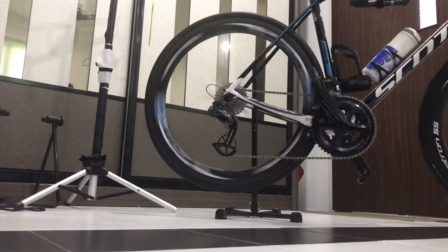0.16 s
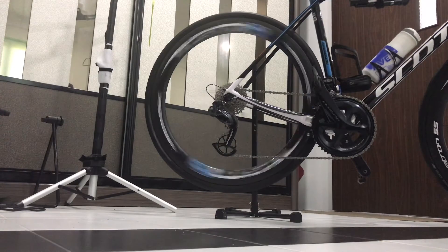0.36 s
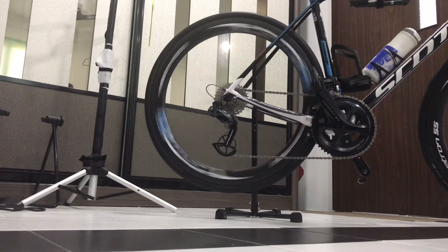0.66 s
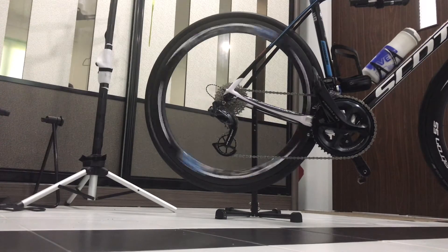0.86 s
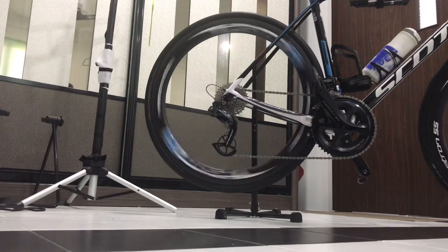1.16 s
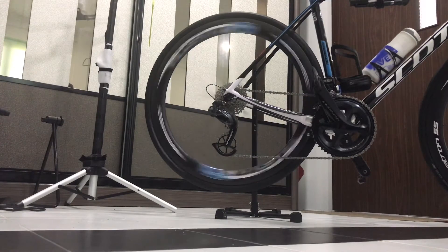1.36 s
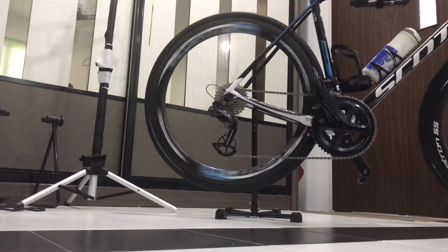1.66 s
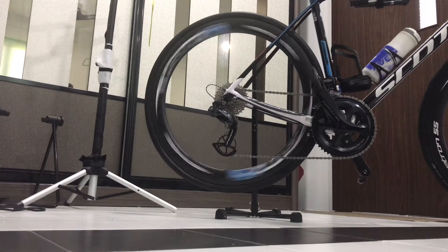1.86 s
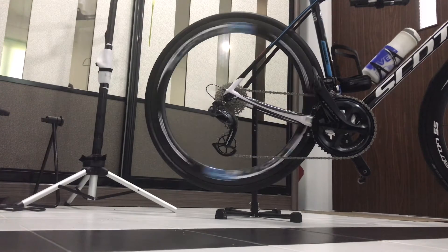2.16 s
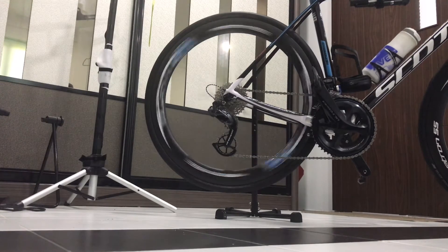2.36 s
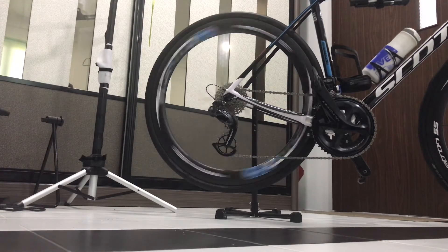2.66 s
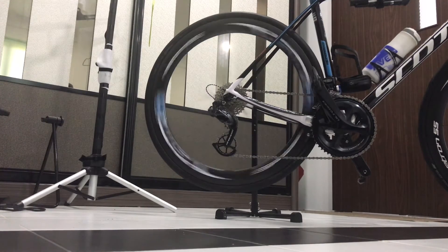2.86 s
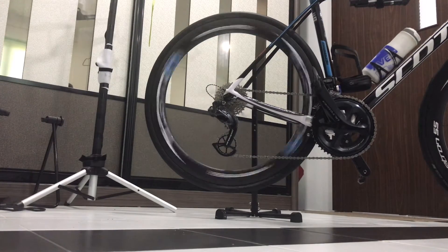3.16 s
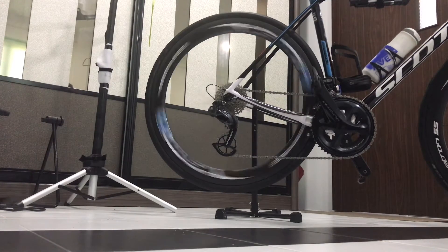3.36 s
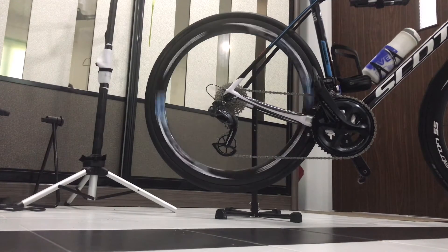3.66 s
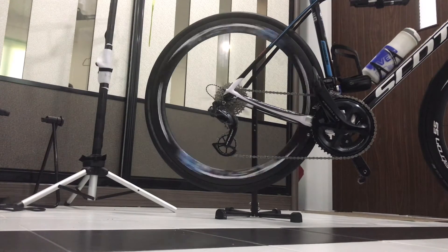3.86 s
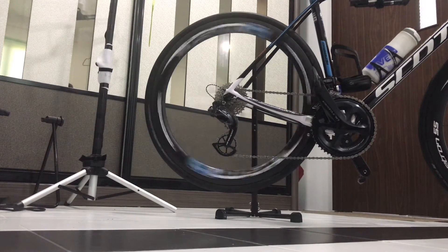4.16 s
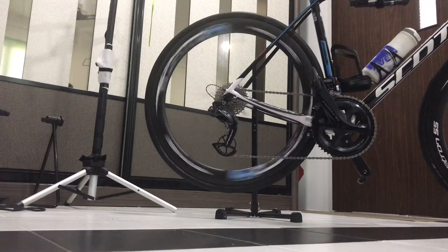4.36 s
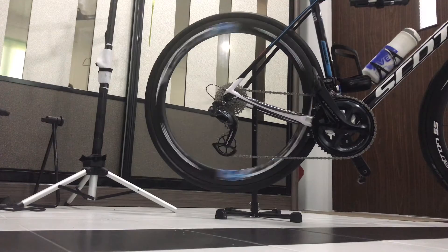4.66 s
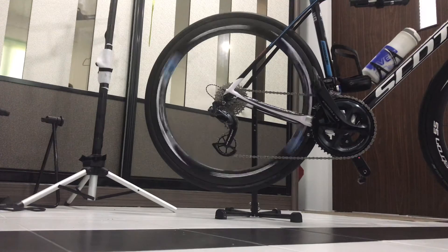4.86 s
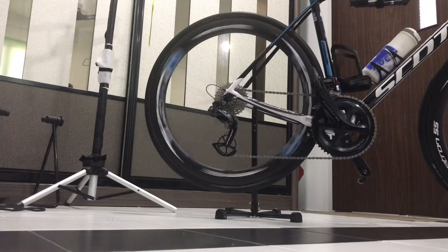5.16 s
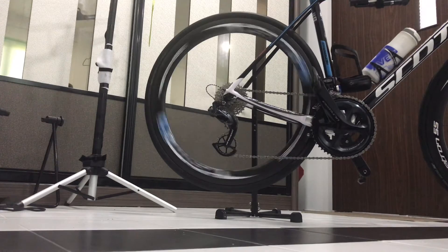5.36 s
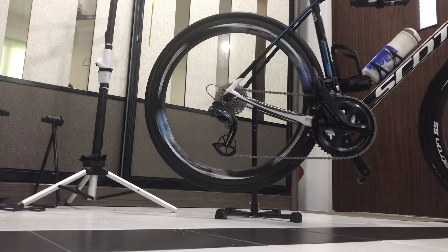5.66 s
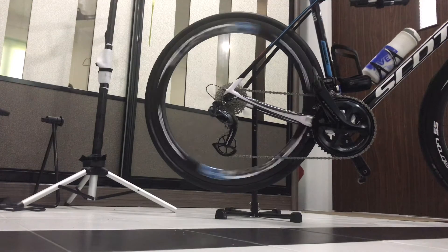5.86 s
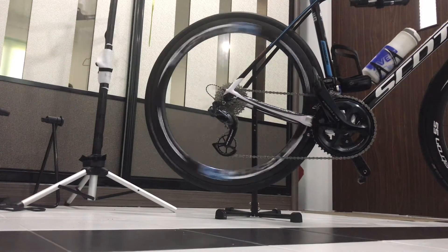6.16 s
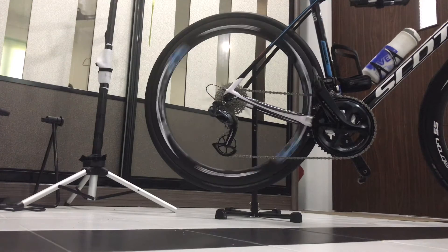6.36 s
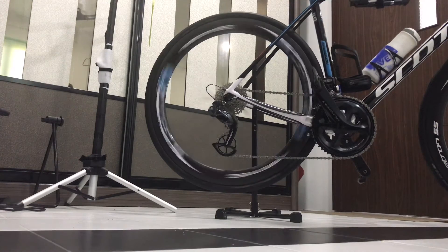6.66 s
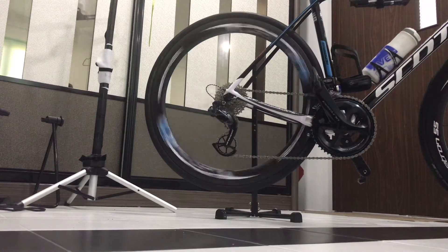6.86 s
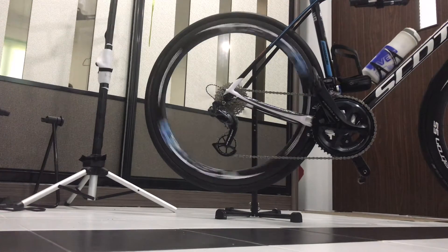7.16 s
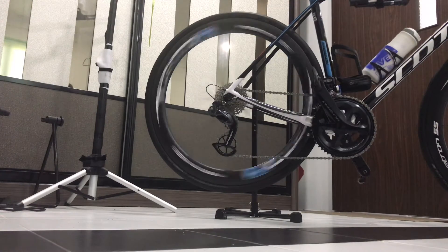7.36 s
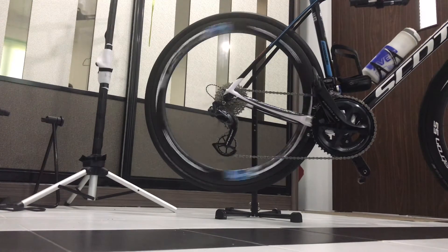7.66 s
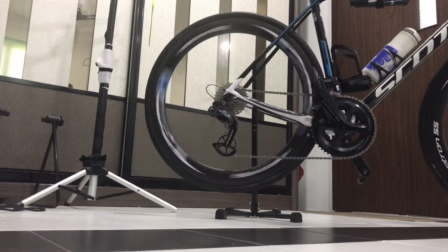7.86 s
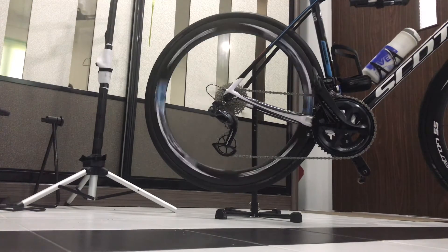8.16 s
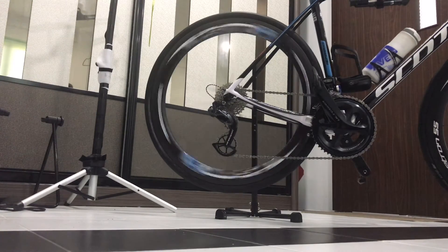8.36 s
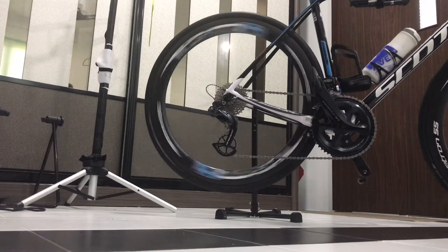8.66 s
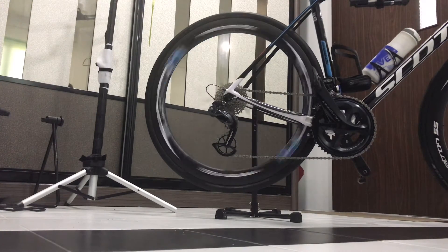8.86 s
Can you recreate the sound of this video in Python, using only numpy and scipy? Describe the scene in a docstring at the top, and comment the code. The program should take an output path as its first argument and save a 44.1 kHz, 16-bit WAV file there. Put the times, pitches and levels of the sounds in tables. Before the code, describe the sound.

Rapid ratchet ticks from a freely spinning bicycle wheel merge into a high, churning buzz that slows slightly in a small room.

```python
"""A coasting bicycle wheel

A rear wheel spins on a stand in a small tiled room, slowly losing speed. In its hub, small catches
(pawls) snap over a 24-tooth ratchet some 40 times a second. Each click is a steel tick, a knock and
a ring of rim, spokes, hub and frame. The rim's note slides down twice a turn and most parts swell with
the wheel's angle, so the buzz churns. The room echoes over a faint ventilation hum."""
import sys
import numpy as np
from scipy import signal
from scipy.fft import rfft, irfft, next_fast_len
from scipy.io import wavfile
from scipy.ndimage import map_coordinates

SR = 44100
rng = np.random.default_rng(int(sys.argv[2]) if len(sys.argv) > 2 else 0)


def transcribe(u):
    """Save the signal u as a 16-bit wav file named by the first command-line argument.

    u: samples, shape (n,) or (channels, n), limited to [-1, 1]; the rate is SR.
    q: integer samples, one column per channel.
    """
    v = np.clip(np.atleast_2d(u).T, -1, 1)
    q = np.round(v * 32767).astype(np.int16)
    wavfile.write(sys.argv[1], SR, q)


N = 397782

TEETH = 24
AGE = np.arange(4096) / SR  # seconds since a click began


def freehub():
    """Pawls snap over teeth and shake the wheel: each click's start time, tooth and sound (one a row)."""
    times, tooth, speed = ratchet(jitter_s=0.0001)
    impact = pawl_tick(tooth) + wheel_knock(tooth)
    ringing = rim_ring(tooth) + spoke_ring(tooth) + hub_ring(tooth) + frame_ring()
    hard_db = 1.3 * bell(tooth[:, None], centre=22.6, width=0.7)  # a few teeth snap harder
    force = amp(hard_db + 0.21 * rng.standard_normal((len(times), 1)))
    force *= speed[:, None] ** 0.084  # a slower wheel drops its pawls more gently
    return times, tooth, force * (treble_dip(impact, tooth) + ringing)


def ratchet(jitter_s):
    """The wheel slows: when each pawl drops, on which tooth, and the speed as a share of the first."""
    t = np.arange(-SR // 4, N) / SR  # the wheel is already spinning
    rate, slowing, easing = 46.829, 1.161, 0.01462  # teeth per s, s^2, s^3; air drag eases as it slows
    teeth_passed = rate * t - slowing * t ** 2 / 2 + easing * t ** 3 / 6
    count = np.arange(int(teeth_passed[0]), int(teeth_passed[-1]) + 1)
    times = 0.0185 + np.interp(count, teeth_passed, t)
    gaps = np.gradient(times)
    late_s = 0.00035 * np.cos(wheel_angle(count, 8.7))  # the ratchet sits off centre
    late_s += jitter_s * rng.standard_normal(len(times))
    return times + late_s, count % TEETH, gaps[0] / gaps


def pawl_tick(tooth):
    """A steel pawl hits a steel tooth with a short, bright tick."""
    # tone colour of steel on steel: f/Hz, level/dB
    spectrum = [(3500, -55), (5200, -18.5), (6000, -8.5), (7000, -12.5), (7900, -6.5), (8350, -10.5),
                (8850, -2.5), (9350, -1.5), (9850, -0.5), (10500, -6), (11000, 0.5), (11900, -2),
                (13500, -2), (15800, -3.5)]
    gain = amp(swing(tooth, once=(0.3, 17), twice=(0.1, 12.7), wear_db=0.3) - 3.0)
    return gain * struck(crowded_notes(tooth, spectrum, fresh=0.69), attack_s=0.00037, fade_s=0.026)


def wheel_knock(tooth):
    """The blow runs through the spokes and hollow rim, stirring many notes at once."""
    # tone colour of spokes and rim together: f/Hz, level/dB
    spectrum = [(400, -36), (800, -25), (1300, -17.5), (1680, -2), (2050, -3.5), (2550, -2), (2800, -1),
                (3270, -6.5), (3480, -7), (3720, -10.5), (3980, -7), (4550, -14.5), (4850, -18.5),
                (7000, -64)]
    gain = amp(swing(tooth, once=(0.3, 18), twice=(0.4, 9), wear_db=0.5) - 10.5)
    return gain * struck(crowded_notes(tooth, spectrum, fresh=0.79), attack_s=0.0005, fade_s=0.057)


def treble_dip(clicks, tooth):
    """The lower treble of the clicks dips and returns once a turn."""
    n = 2 * len(AGE)
    band = bell(np.fft.rfftfreq(n, 1 / SR), centre=5200, width=960)
    change_db = swing(tooth, once=(1.5, 15.5), twice=(0.5, 10.5), wear_db=0.3)
    return irfft(rfft(clicks, n) * amp(change_db * band))[:, :len(AGE)]


def rim_ring(tooth):
    """The rim's note slides down twice a turn as the wheel shows another side."""
    # slides of the rim's note: first tooth, last tooth, start f/Hz, end f/Hz
    slides = [(8, 20, 2190, 1780), (21, 31, 2190, 1550)]
    hz = np.zeros((TEETH, 1))
    for first, last, start_hz, end_hz in slides:
        teeth = np.arange(first, last + 1) % TEETH
        hz[teeth, 0] = np.linspace(start_hz, end_hz, len(teeth))
    swell_db = 8.5 * bell(hz[tooth], centre=1890, width=75)  # the pitch where the rim rings best
    return amp(swell_db - 19.6) * note(tooth, hz[tooth], fade_s=0.027, scatter=0.24)


def spoke_ring(tooth, spread_hz=58):
    """The spokes ring with two notes whose pitch differs a little from tooth to tooth."""
    low_db = swing(tooth, once=(2.2, 19.4), twice=(1.64, 10.4), wear_db=1.2)
    low_hz = 2804 - 15 * low_db + spread_hz * quirk(tooth)  # lowest where it is loudest
    low = amp(low_db - 22.0) * note(tooth, low_hz, fade_s=0.033, scatter=0.27)
    high_hz = 3514 + spread_hz * quirk(tooth)
    high_db = swing(tooth, once=(3, 12.5), twice=(4.2, 3.8), wear_db=4.6)
    high = amp(high_db - 26.5) * note(tooth, high_hz, fade_s=0.038, scatter=0.3)
    return low + high


def hub_ring(tooth):
    """The hub and its gears give a brief, high ring."""
    # notes of hub and gears: f/Hz, level/dB, time to fade by 60 dB/s
    notes = [(6320, 0, 0.03), (6417, -3, 0.04), (9880, 4.5, 0.0059), (10990, 1, 0.011)]
    gain = amp(swing(tooth, once=(0.73, 19), twice=(0.27, 9.5), wear_db=1.2) - 22)
    return gain * sum(amp(db) * note(tooth, hz, fade_s, scatter=0.83) for hz, db, fade_s in notes)


def frame_ring():
    """The frame answers every tooth alike, giving the buzz faint overtones of the click rate."""
    # notes of frame and stand: f/Hz, level/dB, time to fade by 60 dB/s
    notes = [(593, -10, 0.053), (943, -7, 0.063), (1023, -5.5, 0.12), (1198, -3, 0.047), (1553, 2.5, 0.12)]
    rings = [amp(db) * struck(np.sin(2 * np.pi * hz * AGE), 0.00038, fade_s) for hz, db, fade_s in notes]
    return amp(-33.5) * sum(rings)


def room(clicks, tooth, first_wall_s, steady):
    """Floor and walls echo each click along paths that change with the wheel's angle."""
    # how long the tiled room rings: f/Hz, time to fade by 60 dB/s
    fade_times = [(300, 0.34), (2000, 0.28), (7000, 0.44), (12000, 0.17), (15800, 0.28)]
    noise = rng.standard_normal((TEETH, 2 * len(AGE)))
    noise += steady * rng.standard_normal(2 * len(AGE))  # paths shared by all angles
    hz, t, bands = signal.stft(noise, SR, nperseg=256)
    fade = amp(-60 * t / value_at(fade_times, hz)[:, None])
    tails = signal.istft(bands * fade, SR, nperseg=256)[1]
    delay = np.arange(tails.shape[1]) / SR
    tails *= 1 - np.exp(-(delay / first_wall_s) ** 2)  # echoes take a moment to build
    tails /= np.linalg.norm(tails, axis=1, keepdims=True)
    return signal.fftconvolve(clicks, tails[tooth], axes=1)


def ventilation(rush_db, waver):
    """Air rushes softly over a few low, slightly unsteady hum tones."""
    # tone colour of the moving air: f/Hz, level/dB
    spectrum = [(20, -40), (33, -22), (42, 0.5), (70, -3.5), (100, 0.5), (160, 0.5), (240, -3.5), (300, -2),
                (450, -8), (600, -7), (800, -14), (1500, -11), (6000, -21)]
    # tones of the hum: f/Hz, level/dB
    tones = [(49.5, -69), (99, -64), (142, -71.5), (161.5, -65)]
    t = np.arange(N) / SR
    rush = coloured(rng.standard_normal(next_fast_len(N)), spectrum)[:N]
    hum = np.zeros(N)
    for hz, db in tones:
        drift = map_coordinates(rng.standard_normal(64), [t * 3])  # glides through 3 values a second
        hum += amp(db) * np.sqrt(2) * np.sin(2 * np.pi * hz * t + waver * drift)
    return amp(rush_db) * rush / rush.std() + hum


def crowded_notes(tooth, spectrum, fresh):
    """Each tooth stirs its own noisy mix of notes; `fresh` adds a part that is new on every click."""
    own = rng.standard_normal((TEETH, len(AGE)))[tooth]
    return coloured(own + fresh * rng.standard_normal(own.shape), spectrum)


def note(tooth, hz, fade_s, scatter):
    """One ringing note; each tooth starts the wave at its own point, give or take `scatter` radians."""
    phase = rng.uniform(0, 2 * np.pi, TEETH)[tooth] + scatter * rng.standard_normal(len(tooth))
    return struck(np.sin(2 * np.pi * hz * AGE + phase[:, None]), attack_s=0.0014, fade_s=fade_s)


def struck(vibration, attack_s, fade_s):
    """A struck part swells quickly, then fades by 60 dB in `fade_s`; each row has energy 1."""
    shaped = vibration * (1 - np.exp(-(AGE / attack_s) ** 2)) * amp(-60 * AGE / fade_s)
    return shaped / np.linalg.norm(shaped, axis=-1, keepdims=True)


def swing(tooth, once, twice, wear_db):
    """Level change in dB: swells once and twice a turn, each (dB, loudest tooth), plus tooth wear."""
    (once_db, once_at), (twice_db, twice_at) = once, twice
    turning = once_db * np.cos(wheel_angle(tooth, once_at))
    turning += twice_db * np.cos(2 * wheel_angle(tooth, twice_at))
    return turning[:, None] + wear_db * quirk(tooth)


def quirk(tooth):
    """A random trait of each tooth, the same on every turn."""
    own = rng.standard_normal((TEETH, 1))
    return ((own - own.mean()) / own.std())[tooth]


def wheel_angle(tooth, from_tooth):
    """How far the wheel has turned past a given tooth, in radians."""
    return 2 * np.pi * (tooth - from_tooth) / TEETH


def amp(db):
    """Turns decibels into a factor to multiply by."""
    return 10 ** (np.asarray(db) / 20)


def bell(x, centre, width):
    """A smooth bump of height 1."""
    return np.exp(-((x - centre) / width) ** 2)


def value_at(points, hz):
    """Reads between the (f/Hz, value) rows of a table, with octaves evenly spaced."""
    freqs, values = np.transpose(points)
    return np.interp(np.log(hz + 1), np.log(freqs), values)


def coloured(noise, spectrum):
    """Gives noise the tone colour of an (f/Hz, level/dB) table."""
    n = noise.shape[-1]
    gain = amp(value_at(spectrum, np.fft.rfftfreq(n, 1 / SR)))
    return irfft(rfft(noise) * gain, n)


def laid_out(times, rows):
    """Adds up the rows, each from its own start time; a spare second in front holds early clicks."""
    place = np.round((times + 1) * SR).astype(int)[:, None] + np.arange(rows.shape[1])
    return np.bincount(place.ravel(), rows.ravel(), N + SR)[SR:N + SR]


def scene():
    """The coasting wheel, its echoes and the ventilation, in one channel."""
    times, tooth, clicks = freehub()
    echoes = amp(-1.0) * room(clicks, tooth, first_wall_s=0.0033, steady=0.4)
    air = ventilation(rush_db=-52, waver=0.64)
    return (laid_out(times, clicks) + laid_out(times, echoes) + air)[None]


def record(dry):
    """Cuts off the very highest treble."""
    n = next_fast_len(N + SR // 2)
    hz = np.fft.rfftfreq(n, 1 / SR)
    return irfft(rfft(dry, n) * (hz < 15790), n)[..., :N]


dry = scene()
out = record(dry)
transcribe(out)
```